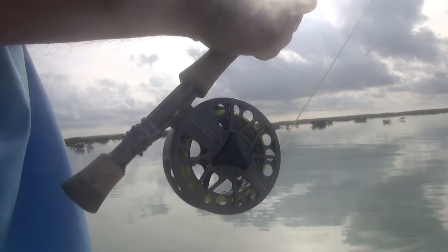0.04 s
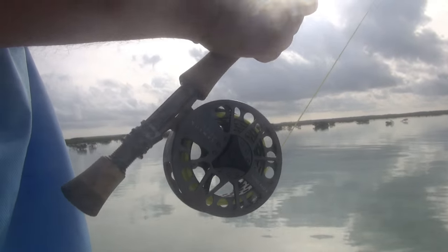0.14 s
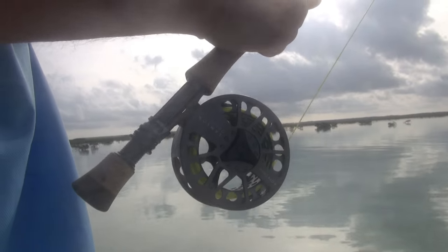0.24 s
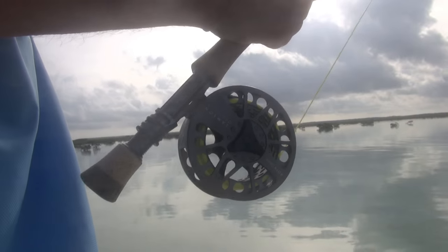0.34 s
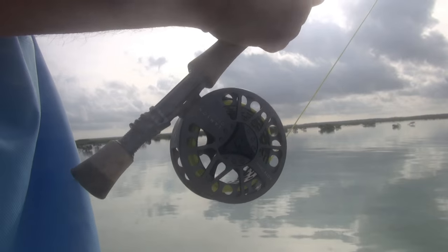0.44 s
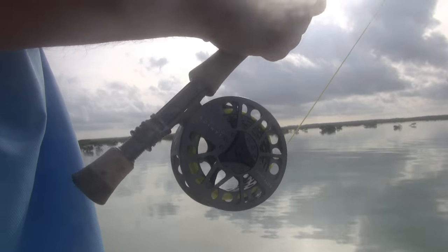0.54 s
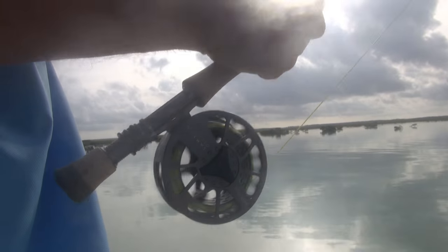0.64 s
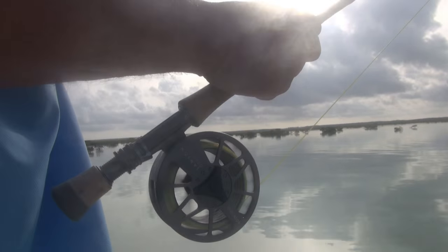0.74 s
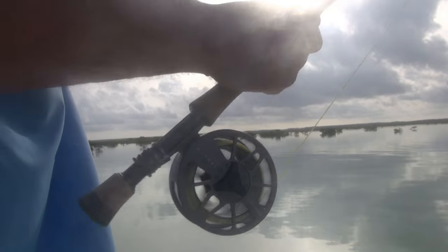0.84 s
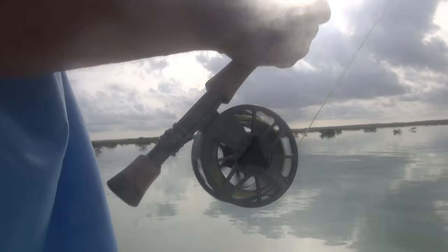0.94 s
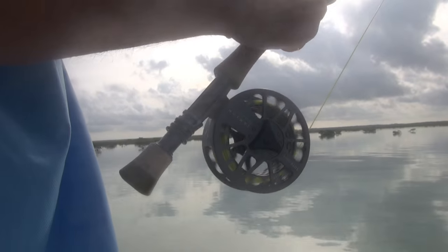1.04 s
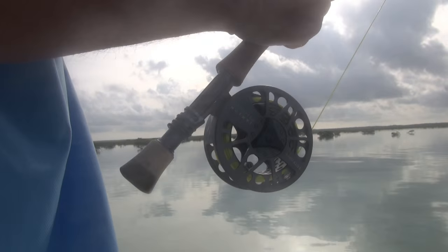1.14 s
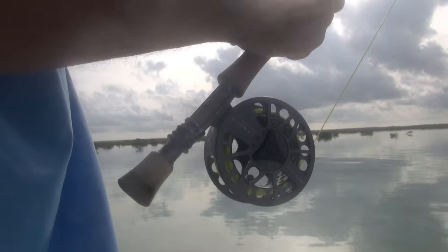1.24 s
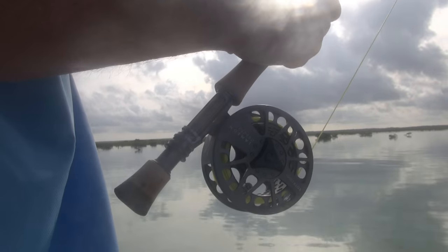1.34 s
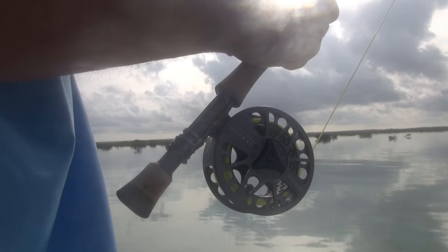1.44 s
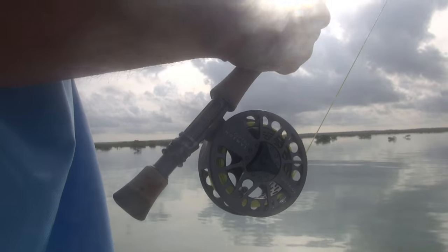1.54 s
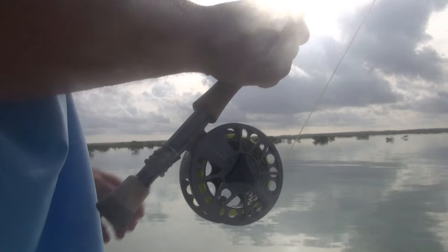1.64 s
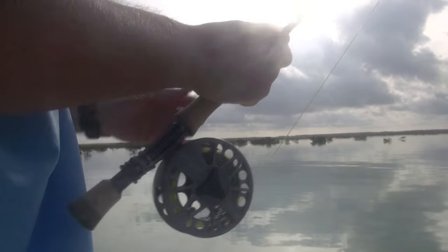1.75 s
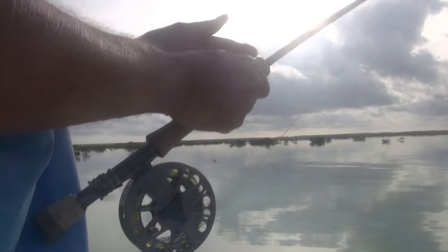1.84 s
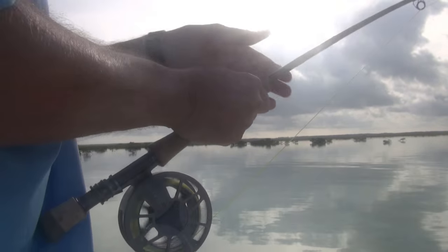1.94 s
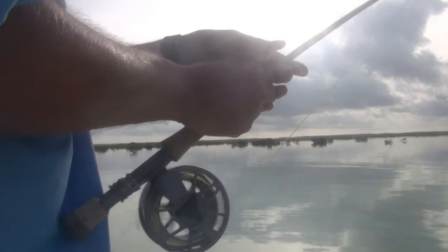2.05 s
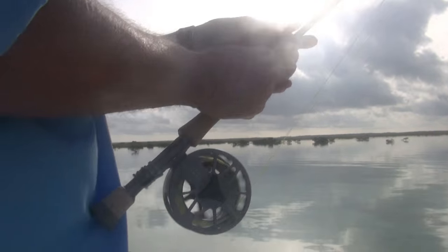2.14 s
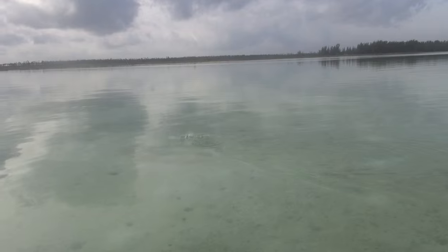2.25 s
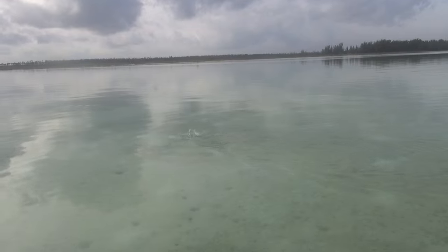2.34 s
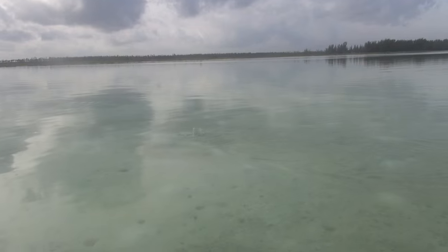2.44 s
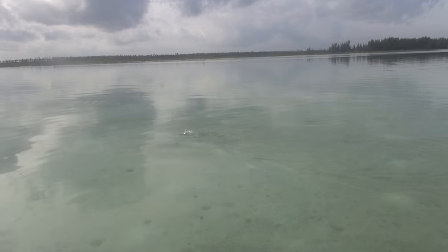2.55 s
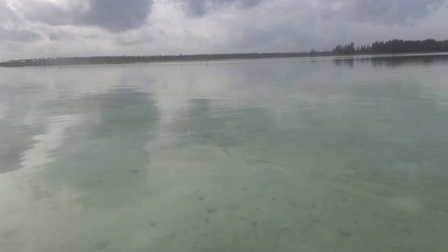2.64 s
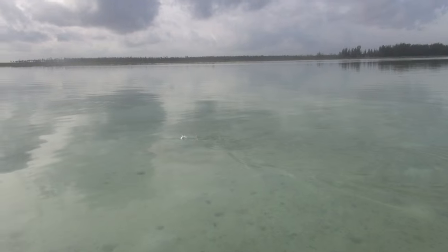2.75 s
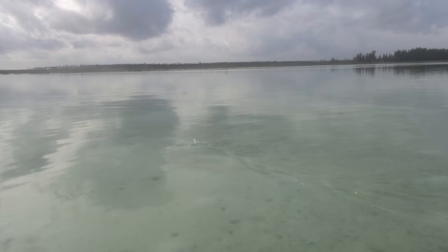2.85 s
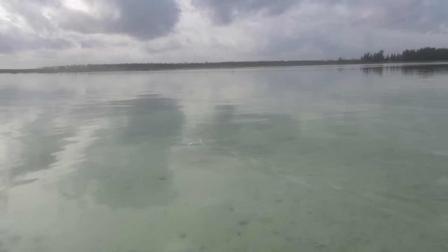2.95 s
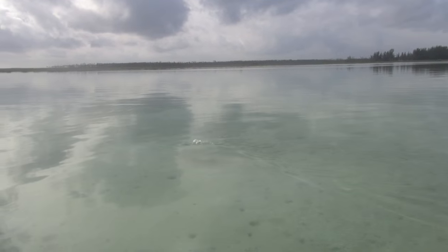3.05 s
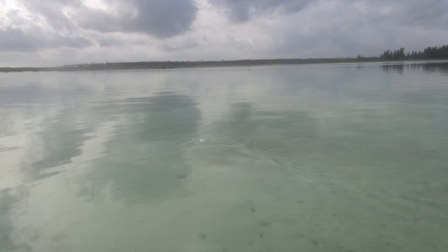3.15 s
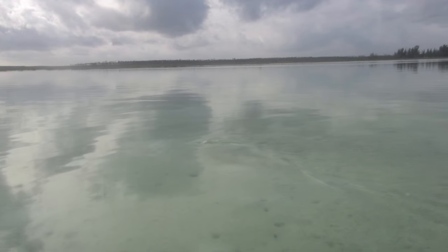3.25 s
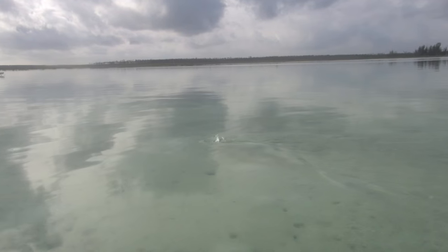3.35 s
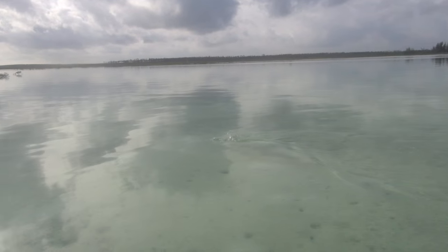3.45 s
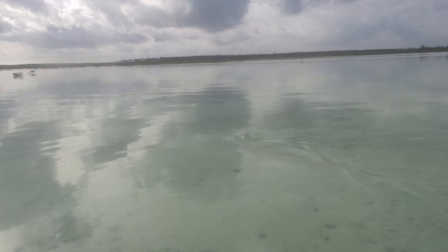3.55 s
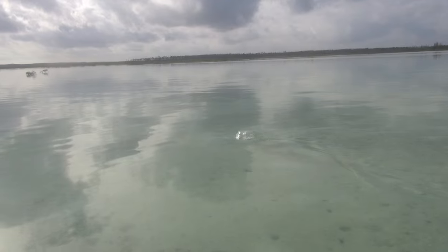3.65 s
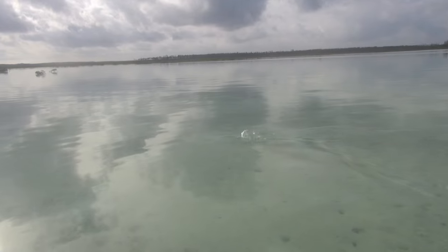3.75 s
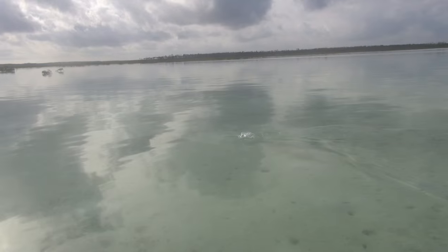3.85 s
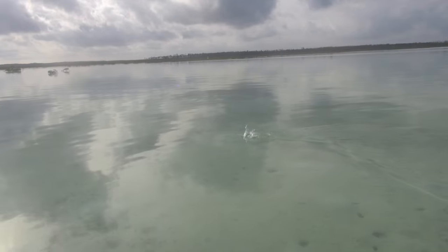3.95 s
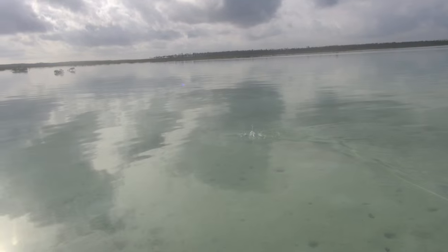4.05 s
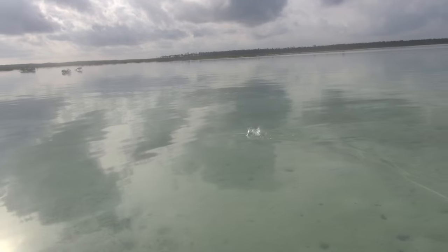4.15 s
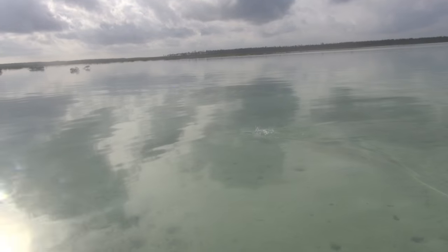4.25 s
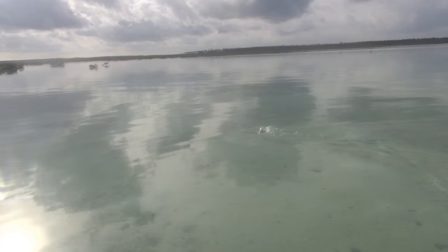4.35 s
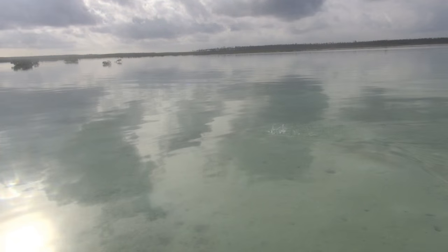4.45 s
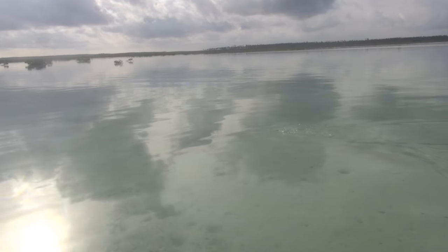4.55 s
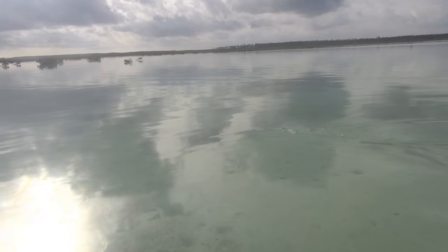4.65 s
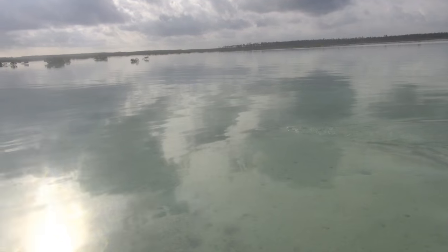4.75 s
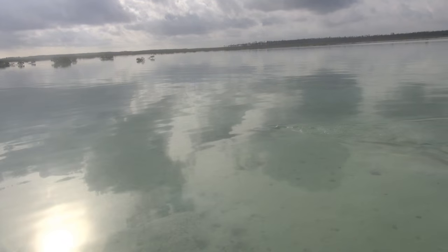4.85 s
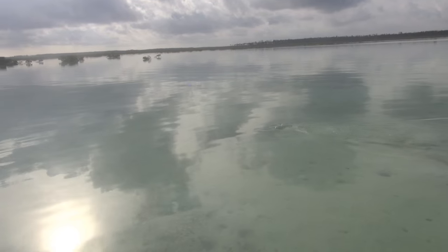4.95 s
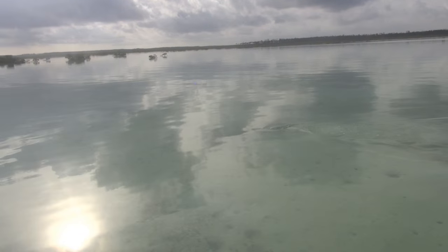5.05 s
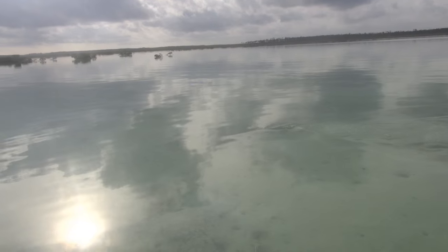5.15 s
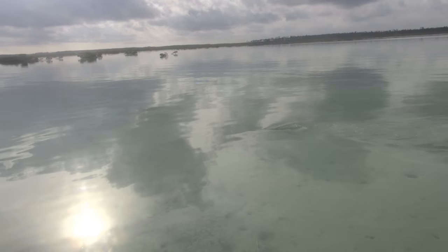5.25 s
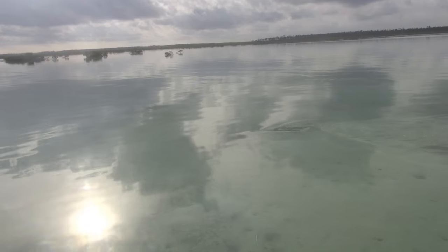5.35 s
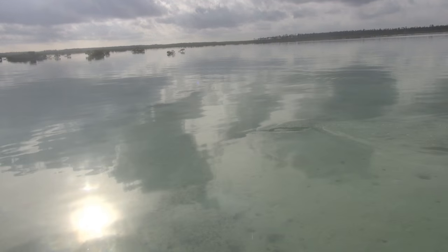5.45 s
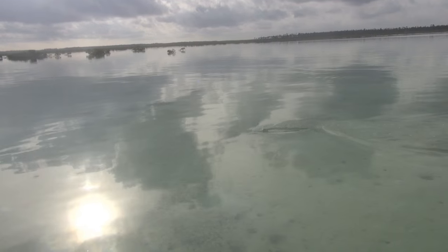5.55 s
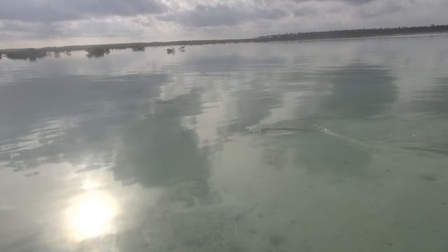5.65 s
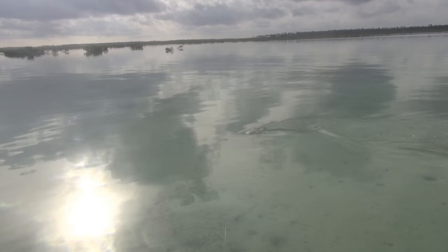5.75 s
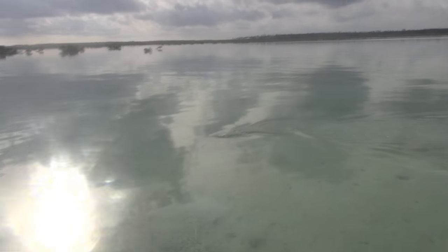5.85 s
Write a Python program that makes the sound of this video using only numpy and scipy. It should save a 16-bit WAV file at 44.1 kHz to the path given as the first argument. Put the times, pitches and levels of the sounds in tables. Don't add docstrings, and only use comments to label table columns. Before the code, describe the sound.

Open, echo-free flats with a faint lumpy wind rumble, slight hiss and a barely audible distant drone. Small line ticks come at 0.2 to 0.6 seconds, with a grainy finger rub just before the reel. From 0.65 to 1.12 a close fly reel buzzes: hard, bright metallic clicks accelerate into a high rasp by 0.8, then slow to separate ticks. A quiet gap follows, with soft line rubbing around 1.7 and a lone click at 1.9. A second buzz rises from 1.93 and is cut off at 2.19. Instantly the scene becomes shallow water, with stronger low wind thumps. Irregular plops, sharp little drops, gurgling bubbles and crackling spray continue, densest from about 3.4 to 4.7, thinning after 5.1 to near calm, with a few drops from 5.7 and a final plop near 5.9. The single-microphone sound begins left and drifts towards centre.

```python
import sys
import numpy as np
from scipy import signal
from scipy.fft import rfft, irfft
from scipy.io import wavfile

SR = 44100
rng = np.random.default_rng(int(sys.argv[2]) if len(sys.argv) > 2 else 0)


def materialize(psi):
    bounded = np.clip(np.atleast_2d(psi).T, -1, 1)
    quanta = np.round(bounded * 32767).astype(np.int16)
    wavfile.write(sys.argv[1], SR, quanta)


def magnitude_from_level(level_db):
    exponent = np.asarray(level_db, float) / 20
    return 10 ** exponent


N = 260487
CUT_S = 2.1932


def rms_one(x):
    return x / np.sqrt(np.mean(x ** 2) + 1e-20)


def in_time(rows, outside_db=-120):
    s, *columns = np.transpose(rows)
    t = np.arange(N) / SR
    return [np.interp(t, s, c, left=outside_db, right=outside_db) for c in columns]


def coloured(spectrum):
    hz, level_db = np.transpose(spectrum)
    log_hz = np.log(np.fft.rfftfreq(N, 1 / SR) + 1)
    gain = magnitude_from_level(np.interp(log_hz, np.log(hz), level_db))
    return rms_one(irfft(rfft(rng.standard_normal(N)) * gain, N))


def drift(rate, size):
    r = np.exp(-2 * np.pi * rate)
    white = rng.standard_normal((size[0], size[1] + 400))
    slow = signal.lfilter([1], [1, -2 * r, r * r], white)[:, 400:]
    return slow / slow.std(axis=1, keepdims=True)


def add(out, s, sound):
    i = int(s * SR)
    out[i:i + len(sound)] += sound[:max(N - i, 0)]


def band(x, low_hz, high_hz):
    return signal.sosfilt(signal.butter(2, [low_hz, high_hz], "band", fs=SR, output="sos"), x)


def wind():
    # time_s, level_db
    gusts = [(0.0, -39.5), (0.34, -43.5), (0.38, -35.5), (0.79, -43), (0.85, -38.5), (1.08, -46),
             (1.2, -41), (1.23, -46.5), (1.3, -37), (1.46, -53), (1.49, -38.5), (1.82, -45.5), (1.87, -37),
             (2.02, -45.5), (2.1, -37), (2.15, -66), (2.2, -24), (2.23, -28.5), (2.48, -28.5), (2.55, -35),
             (2.74, -29.5), (2.79, -20), (2.84, -19), (2.91, -28), (3.02, -40.5), (3.06, -30), (3.11, -41),
             (3.45, -43.5), (3.48, -30.5), (3.63, -34.5), (3.65, -27.5), (3.73, -40), (3.96, -27),
             (3.99, -37.5), (4.11, -21.5), (4.16, -40.5), (4.19, -23.5), (4.27, -35), (4.42, -34),
             (4.45, -20), (4.55, -38.5), (4.62, -23.5), (4.7, -38), (4.72, -25), (4.76, -21), (4.83, -39.5),
             (4.86, -27), (5.03, -25), (5.06, -35), (5.14, -29), (5.24, -34.5), (5.34, -23), (5.37, -32.5),
             (5.73, -23.5), (5.77, -20), (5.9, -40)]
    # pitch_hz, density_db (per Hz)
    rumble = [(12, -42.5), (20, -23), (44, -3), (70, 4.5), (138, -6), (356, -31.5), (416, -37.5),
              (450, -34.5), (580, -76), (990, -120)]
    lumps = magnitude_from_level(2.0 * drift(.0005, (1, N))[0])
    return magnitude_from_level(in_time(gusts, outside_db=-36)[0]) * rms_one(lumps * coloured(rumble))


def microphone_hiss():
    # pitch_hz, density_db (per Hz)
    hiss = [(210, -40), (350, -5.5), (498, -6.5), (2420, -20), (3080, -24.5), (3340, -20.5), (13900, -27),
            (16000, -21.5)]
    return magnitude_from_level(-59) * coloured(hiss)


def far_motor():
    # pitch_hz, level_db
    hums = [(310, -62), (470, -65), (620, -69.5)]
    out, t = np.zeros(N), np.arange(N) / SR
    swell = np.interp(t, [1.2, 1.55, CUT_S, CUT_S + .001], [0.0, 1, 0.83, 0], left=.4)
    for hz, level_db in hums:
        hum = band(rng.standard_normal(N), hz - 9.0, hz + 8.3)
        out += magnitude_from_level(level_db) * swell * rms_one(hum)
    return out


def gurgles():
    # start_s, length_s, start_hz, end_hz, level_db
    long_bubbles = [(.1, .05, 767, 1000, -56), (.435, 0.031, 610, 350, -49),
                    (2.277, 0.039, 1506, 1350, -40), (2.34, 0.13, 521, 850, -42.5),
                    (2.545, .055, 930, 1300, -45), (2.6, 0.09, 862, 800, -44.5),
                    (2.696, 0.041, 564, 1100, -41.5), (2.915, 0.046, 720, 750, -49),
                    (3.01, 0.02, 920, 1050, -42), (3.105, 0.025, 1060, 1300, -47),
                    (3.39, 0.044, 910, 800, -43), (3.51, 0.034, 555, 540, -40),
                    (3.6, 0.049, 666, 750, -34.5), (3.62, 0.014, 810, 2000, -29),
                    (4.12, 0.047, 705, 1200, -31), (4.265, 0.037, 1014, 2200, -38),
                    (4.33, 0.082, 478, 560, -35), (4.545, 0.043, 880, 1600, -39),
                    (4.715, 0.071, 926, 800, -40), (4.86, 0.022, 895, 850, -43),
                    (5.08, 0.048, 755, 800, -40), (5.16, 0.053, 820, 1700, -50),
                    (5.26, 0.026, 1070, 1000, -45), (5.885, 0.025, 847, 900, -37.5)]
    out, waver = np.zeros(N), drift(0.0012, (30, 5000))
    for k, (s, length_s, start_hz, end_hz, level_db) in enumerate(long_bubbles):
        u = np.linspace(0, 1, min(int(length_s * SR), 5000))
        glide = (end_hz / start_hz) ** (u ** 11.0)
        hz = start_hz * glide * (1 + 0.027 * waver[k, :len(u)])
        swell = np.minimum(25 * u, 1) * (1 - u) ** 1.35
        swell = swell * magnitude_from_level(3.8 * waver[-1 - k, :len(u)])
        add(out, s, magnitude_from_level(level_db) * swell * np.sin(2 * np.pi * np.cumsum(hz) / SR))
    return out


def line_ticks():
    # start_s, peak_db
    flicks = [
        (0.235, -40),
        (.307, -54),
        (0.609, -43),
    ]
    out, t = np.zeros(N), np.arange(400) / SR
    for s, peak_db in flicks:
        burst = band(rng.standard_normal(400), 900, 7000)
        add(out, s, magnitude_from_level(peak_db) * burst * magnitude_from_level(-60 * t / .012))
    return out


def line_rub():
    # time_s, level_db
    strokes = [
        [(0.32, -84), (0.35, -45), (0.385, -74)],
        [(0.485, -67), (0.527, -39.5), (0.633, -57.5), (0.643, -29)],
        [(1.5, -71), (1.66, -70), (1.672, -45), (1.736, -39), (1.758, -57.5), (1.78, -51)],
        [(1.781, -56), (1.895, -49.5), (1.903, -27.5), (1.928, -44.5)],
    ]
    # pitch_hz, width_hz, level_db
    resonances = [(1300, 2100, -2), (2500, 670, 6.5), (3837, 700, -4), (4970, 880, -5), (7000, 270, -10),
                  (9600, 3000, -19.5)]
    grit = rng.standard_normal(N) * magnitude_from_level(2.1 * drift(0.0037, (1, N))[0])
    out = 0
    for k, (hz, width_hz, level_db) in enumerate(resonances):
        r = np.exp(-np.pi * width_hz / SR)
        zeros = [(1 - r * r) / 2, 0, (r * r - 1) / 2]
        poles = [1, -2 * r * np.cos(2 * np.pi * hz / SR), r * r]
        out = out + (-1) ** k * magnitude_from_level(level_db) * signal.lfilter(zeros, poles, grit)
    return rms_one(out) * sum(magnitude_from_level(in_time(stroke)[0]) for stroke in strokes)


def tooth_times(pull):
    s, rate_hz = np.transpose(pull)
    fine = np.arange(s[0], s[-1], 1 / SR)
    teeth = np.cumsum(np.interp(fine, s, rate_hz)) / SR
    whole = np.linspace(0, teeth[-1], round(teeth[-1]) + 1)
    times = np.interp(whole, teeth, fine)
    return times, np.interp(times, s, rate_hz)


def pawl(times, rate_hz, ring_db, chatter_db):
    # pitch_hz, level_db, t60_s
    frame = [(1594, -18.5, 0.024), (2393, -3.5, .012), (2854, -1.5, 0.012), (3205, -7.5, 0.0089),
             (3650, -3.5, 0.018), (3918, -8.5, 0.034), (4250, -11, 0.03), (4745, -11, 0.0174)]
    # pitch_hz, level_db, t60_s
    spool = [(6890, -20, 0.011), (7950, -5, 0.022), (8900, -25, 0.0076), (9580, -11, 0.025),
             (10160, -7.5, 0.011), (10770, 4.5, 0.014), (11260, -10.5, .012), (11950, -1.5, 0.025),
             (12600, -5.5, 0.023), (13800, -7.5, 0.0099), (14900, -4, 0.012)]
    # pitch_hz, density_db (per Hz)
    crack = [(710, -68), (1200, -55), (2400, -8.5), (3290, -8.5), (3660, 3.5), (5590, -10.5), (11300, -5),
             (16000, -30)]
    crack_hz, crack_db = np.transpose(crack)
    snap_hz = np.geomspace(2000, 15800, 40) * magnitude_from_level(rng.normal(0, 0.1, 40))
    snap_db = np.interp(np.log(snap_hz), np.log(crack_hz), crack_db) - 6.0
    snap_db = snap_db + 10 * np.log10(snap_hz / 4000)
    snap = np.stack([snap_hz, snap_db, np.full(40, .012)], axis=1)
    hz, level_db, t60 = np.concatenate([frame, spool, snap]).T[:, :, None]

    shape = len(hz), 320
    wander_db = 4.0 * drift(.03, shape) + 1.2 * rng.standard_normal(shape)
    phase = rng.uniform(0, 2 * np.pi, (len(hz), 1))
    phase = phase + 1.1 * drift(.012, shape) + .16 * rng.standard_normal(shape)
    late_s = 5e-6 * rng.standard_normal(320)
    out, bright = np.zeros(N), hz[:, 0] > 5200
    for k, s in enumerate(times):
        s += late_s[k]
        t = np.maximum(np.arange(700) / SR - s * SR % 1 / SR, 0)
        decay = magnitude_from_level(level_db + wander_db[:, [k]] - 60 * t / t60)
        modes = decay * np.sin(2 * np.pi * hz * t + phase[:, [k]])
        ring = modes[~bright].sum(0) * (1 - np.exp(-t / 0.00029))
        ring[125:] += .8 * ring[:-125]
        seated = magnitude_from_level(-12.0 / (1 + np.exp((.0027 - t) / 0.0005)))
        chatter = modes[bright].sum(0) * (1 - np.exp(-t / .0006)) * seated
        click = rms_one(ring) + magnitude_from_level(chatter_db[k]) * rms_one(chatter)
        crowding = np.sqrt(SR / 700 / rate_hz[k])
        add(out, s, magnitude_from_level(ring_db[k]) * click * crowding)

    t = np.arange(2500) / SR
    scatter = rng.standard_normal(2500) * magnitude_from_level(-60 * t / 0.022) * (t > .001)
    scatter = scatter / np.linalg.norm(scatter)
    out = out + magnitude_from_level(-17.0) * signal.fftconvolve(out, scatter)[:N]
    return signal.sosfilt(signal.butter(4, 1300, "high", fs=SR, output="sos"), out)


def reel():
    # time_s, rate_hz (teeth per s); a click falls on the first and last row
    pulls = [
        [(.6465, 67.6), (.674, 195.8), (.7, 306), (.732, 469), (.75, 512.4), (.78, 579), (.806, 613),
         (.835, 593), (.868, 568.6), (.894, 547.5), (.95, 449), (.99, 335.4), (1.03, 260.3), (1.06, 187.2),
         (1.09, 118.7), (1.119, 72.2)],
        [(1.9302, 97.7), (1.96, 265), (1.984, 355.3), (2.01, 441), (2.04, 455.8), (2.065, 442), (2.092, 409),
         (2.128, 351.2), (2.1913, 231.6)],
    ]
    # time_s, ring_db (frame), chatter_db (relative to ring)
    pull_levels = [
        [(0.655, -19, -1.5), (0.661, -16.5, -1), (0.789, -19.5, 5.5), (0.857, -19, 3.5), (1.047, -22.5, 3),
         (1.063, -18.5, -2), (1.115, -23.5, -1)],
        [(1.935, -21.5, -9), (1.963, -18.5, 2), (2.107, -17.5, 1), (2.169, -21, 3), (2.188, -21, 0)],
    ]
    # start_s, ring_db, chatter_db (relative to ring)
    lone_click = (1.9045, -22.5, -2.5)
    lone_s, lone_ring_db, lone_chatter_db = lone_click
    rows = [[[lone_s], [100.0], [lone_ring_db], [lone_chatter_db]]]
    for pull, levels in zip(pulls, pull_levels):
        times, rate_hz = tooth_times(pull)
        s, ring_db, chatter_db = np.transpose(levels)
        rows.append([times, rate_hz, np.interp(times, s, ring_db), np.interp(times, s, chatter_db)])
    clicks = np.concatenate(rows, axis=1)[:, :320]
    return pawl(*clicks) * (np.arange(N) < CUT_S * SR)


def bubble(hz, t60, rise, attack=0.00027):
    t = np.arange(int(min(max(t60, .002), .2) * SR)) / SR
    phase = 2 * np.pi * np.cumsum(hz * 2 ** (rise * t)) / SR
    return np.sin(phase) * magnitude_from_level(-60 * t / t60) * (1 - np.exp(-t / attack))


def stirred_water():
    # time_s, bubble_db, spray_db, fizz_db
    stir = [(2.2, -47, -58, -66), (2.35, -50, -54, -55.5), (2.65, -72, -55, -43.5), (2.89, -50.5, -60, -52),
            (3.01, -53.5, -55, -71), (3.12, -60.5, -59.5, -57), (3.3, -51, -53.5, -57),
            (3.42, -47, -52, -77), (3.76, -40, -46, -58.5), (4.19, -47.5, -50, -56.5),
            (4.34, -42, -44, -61), (4.55, -46, -51, -64), (4.68, -56.5, -56, -54), (4.79, -66, -64.5, -58),
            (5.13, -69.5, -65, -62), (5.35, -70, -72.5, -59), (5.63, -79, -62, -57),
            (5.82, -53.5, -58, -49), (5.9, -58, -54, -50)]
    # pitch_hz, density_db (per Hz)
    spray_colour = [(290, -32.5), (500, -28), (649, -10), (906, 6), (2730, 3), (5710, -0.5), (8700, -4.5),
                    (15100, -12), (16000, -15)]
    # pitch_hz, density_db (per Hz)
    fizz_colour = [(3500, -28), (5500, -6.5), (7500, 1.5), (9500, -2), (12500, -10.5), (16000, -24.5)]
    bubble_db, spray_db, fizz_db = in_time(stir)
    small = np.zeros(N)
    for when, pitch, size, life in rng.random((1600, 4)):
        s = CUT_S + when * (N / SR - CUT_S - .01)
        hz = 520 * 2 ** (3.0 * pitch)
        gain = magnitude_from_level(-3.5 * np.log(size + 0.011)) * (600 / hz) ** 0.12
        add(small, s, gain * bubble(hz, (6 + 20 * life ** 2) / hz, 8.4))
    small = small / small[int(CUT_S * SR):].std()
    crackle = magnitude_from_level(4.2 * drift(0.0033, (1, N))[0] + 2.52 * drift(0.00033, (1, N))[0])
    spray = magnitude_from_level(spray_db + 6.5) * rms_one(crackle * coloured(spray_colour))
    fizz = magnitude_from_level(fizz_db - 7.5) * coloured(fizz_colour)
    return magnitude_from_level(bubble_db) * small + spray + fizz


def plops():
    # start_s, peak_db, bubble_hz, tail_db (relative), snap_db (relative)
    plop_list = [(2.229, -39, 500, -23, -20), (2.251, -32, 840, -28, 5.5), (2.279, -32, 1525, -10, 1),
                 (2.337, -42, 546, -10, -7), (2.518, -26.5, 2290, -17, 6.5), (2.554, -39.5, 1320, -14, 14),
                 (2.566, -19.5, 2500, -13.5, -4.5), (2.6, -42, 854, -17, -13), (2.695, -32, 595, -12, -18),
                 (2.751, -19, 1990, -4.5, 3.5), (2.802, -41, 410, 4, -5), (2.862, -39, 403, -5, -17),
                 (2.898, -40, 480, -24, -3), (2.968, -38, 1820, -12, -9), (2.997, -19.5, 1410, -7, -8),
                 (3.093, -36, 1630, -7, -12), (3.158, -31, 1410, -21, -5), (3.184, -25, 2230, -10, -19),
                 (3.252, -27, 1600, -3, -1.5), (3.349, -28, 2150, -15, -18), (3.39, -37, 910, -19, -9),
                 (3.439, -25.5, 960, -3, -5), (3.621, -17, 840, -10, -25), (3.712, -34, 632, -23, -15),
                 (3.763, -46, 604, -6, -2), (3.889, -19, 982, -7.5, -27), (3.924, -21, 1270, -15, -18),
                 (4.052, -31, 1060, -5, -10), (4.096, -28, 1080, -4, -4), (4.122, -23.5, 890, -14, -8),
                 (4.159, -23, 1800, -14, -15), (4.191, -21, 1160, -8.5, -14), (4.224, -21, 1690, -11, -2),
                 (4.33, -39, 530, -12, -7), (4.427, -20.5, 1000, -13, -19), (4.451, -28, 860, -13, -15),
                 (4.499, -19.5, 1220, -21.5, -23), (4.546, -31, 1580, -3, -5), (4.661, -35, 1040, -13, -11),
                 (4.711, -19, 1800, -9.5, -0.5), (4.856, -47, 810, -12, 3), (4.951, -25.5, 1840, -17, -5.5),
                 (4.993, -29, 1900, -16, -16), (5.036, -38, 2400, -20, -14), (5.057, -36.5, 2530, -11, 7),
                 (5.078, -34, 710, -13, -4), (5.159, -46, 824, -9, -20), (5.258, -43, 1040, -14, -17),
                 (5.763, -45, 590, -12.5, -6), (5.889, -31.5, 870, -4, -8)]
    # start_s, peak_db, pitch_hz
    drop_list = [(2.254, -33, 2710), (2.2683, -16.5, 4760), (2.344, -36, 2720), (2.367, -36, 2880),
                 (2.511, -26.5, 3000), (2.57, -24, 2900), (2.7541, -18.5, 2900), (2.8248, -23, 4000),
                 (2.855, -35, 2700), (2.8995, -32, 3830), (2.997, -12.5, 3900), (3.0622, -33.5, 2620),
                 (3.0923, -41, 3250), (3.1711, -43, 3120), (3.1833, -31.5, 2600), (3.2513, -28, 2860),
                 (3.2786, -27, 3700), (3.2973, -23, 4160), (3.3514, -21.5, 2780), (3.391, -37, 4970),
                 (3.42, -50, 2700), (3.4456, -36, 3780), (3.5474, -33, 2930), (3.5615, -27.5, 3680),
                 (3.6229, -21.5, 4510), (3.659, -30, 2720), (3.7264, -38, 3910), (3.7488, -29, 5170),
                 (3.8017, -25.5, 2630), (3.841, -30, 2960), (3.8626, -27, 2750), (3.889, -20.5, 2540),
                 (3.941, -26, 3770), (3.9579, -20, 4400), (3.9967, -46, 2550), (4.074, -29, 3180),
                 (4.099, -28, 3500), (4.132, -29, 4230), (4.1932, -22, 2540), (4.2187, -26.5, 2750),
                 (4.2418, -26, 3220), (4.331, -21.5, 4740), (4.38, -20.5, 3250), (4.3983, -41, 4330),
                 (4.4978, -29, 2880), (4.5196, -38, 2850), (4.5764, -17.5, 3960), (4.6873, -31, 2860),
                 (4.7156, -22.5, 4060), (4.856, -24, 4500), (4.9505, -37, 3240), (5.0374, -42, 2500),
                 (5.057, -40, 2500), (5.6697, -35, 4200), (5.7395, -34, 4530), (5.879, -21.5, 3650)]
    out, t = np.zeros(N), np.arange(2600) / SR
    white = rng.standard_normal((80, 2600))
    snaps = band(white, 1300, 11000) * magnitude_from_level(-60 * t / 0.011)
    tails = band(white[::-1], 1000, 3600) * magnitude_from_level(-60 * t / 0.11)
    tails = tails * magnitude_from_level(7.3 * drift(.004, white.shape))
    swarm = rng.random((80, 7, 3))
    for k, (s, peak_db, hz, tail_db, snap_db) in enumerate(plop_list):
        add(out, s, magnitude_from_level(peak_db - 0.5) * bubble(hz, 35.4 / hz, 7.0))
        add(out, s, magnitude_from_level(peak_db + snap_db - 4.0) * snaps[k])
        add(out, s, magnitude_from_level(peak_db + tail_db - 0.5) * tails[k])
        for when, pitch, size in swarm[k]:
            small_hz = hz * 2 ** (1.8 * pitch - .6)
            small_db = peak_db + tail_db - 3.7 * size - 12.5 * when
            add(out, s + 0.059 * when, magnitude_from_level(small_db) * bubble(small_hz, 24.0 / small_hz, 18.0))
    for k, (s, peak_db, hz) in enumerate(drop_list):
        add(out, s, magnitude_from_level(peak_db + 1.5) * bubble(hz, 24.0 / hz, 17.0, attack=0.000086))
        add(out, s, magnitude_from_level(peak_db - 13.0) * snaps[-1 - k])
    return out


def scene():
    # time_s, balance_db (left minus right)
    pan = [(0.0, 7.5), (0.95, 5.5), (1.36, 7), (2.35, 5), (2.51, 3), (3.12, 5.0), (3.45, 4), (5.64, 0),
           (5.9, 1.5)]
    air = wind() + microphone_hiss() + far_motor()
    tackle = line_ticks() + line_rub() + reel()
    water = gurgles() + stirred_water() + plops()
    mono = air + tackle + water
    s, balance_db = np.transpose(pan)
    half = magnitude_from_level(np.interp(np.arange(N) / SR, s, balance_db) / 2)
    left, right = half, 1 / half
    return 2 * mono * np.array([left, right]) / (left + right)


def low_pass(x):
    return signal.sosfilt(signal.butter(12, 16810, fs=SR, output="sos"), x)


def record(dry):
    cutoff_hz = 15900
    shelf = signal.cheby2(10, 30, cutoff_hz, fs=SR, output="sos")
    wall = signal.cheby2(12, 60, cutoff_hz + 1100, fs=SR, output="sos")
    clipped = np.clip(dry, -1, 1)
    mix = signal.sosfilt(np.vstack([shelf, wall]), clipped)
    return low_pass(mix)


dry = scene()
out = record(dry)
materialize(out)
```